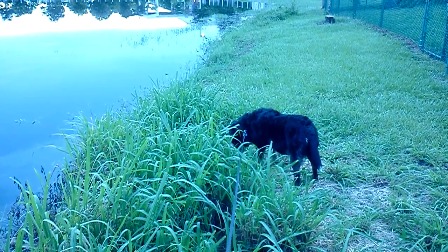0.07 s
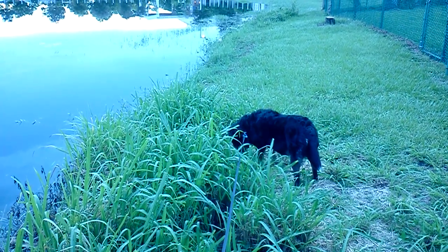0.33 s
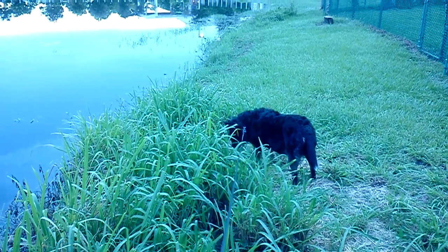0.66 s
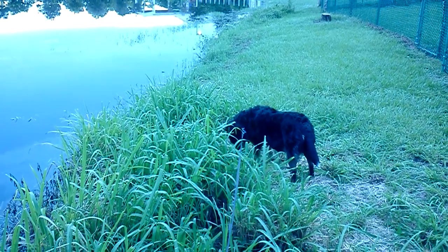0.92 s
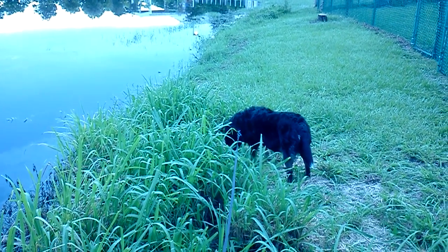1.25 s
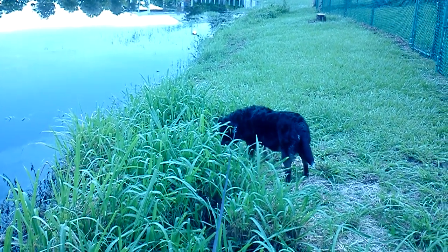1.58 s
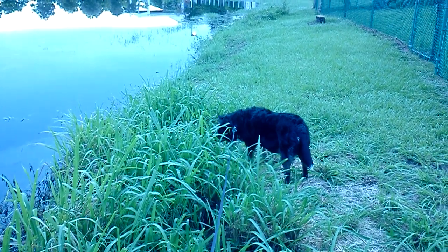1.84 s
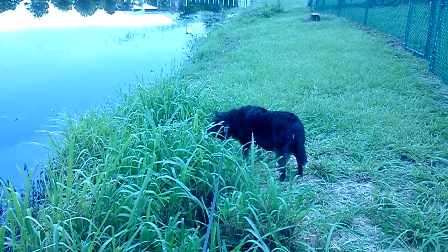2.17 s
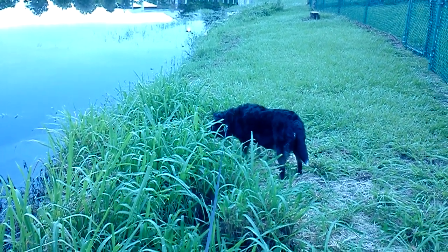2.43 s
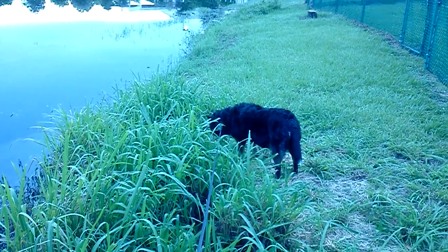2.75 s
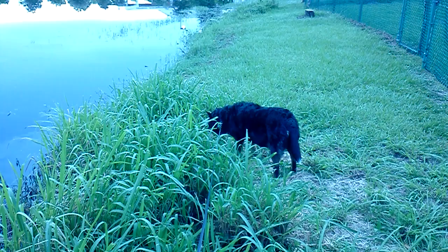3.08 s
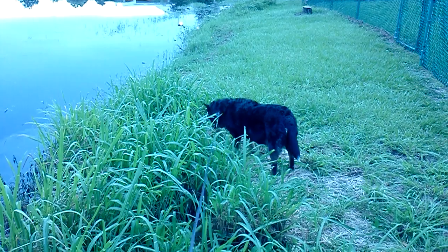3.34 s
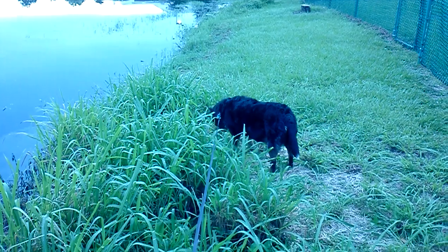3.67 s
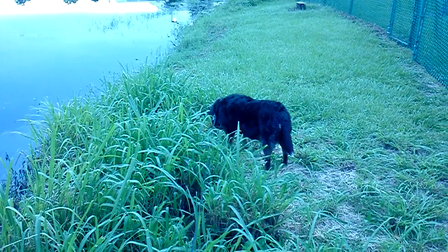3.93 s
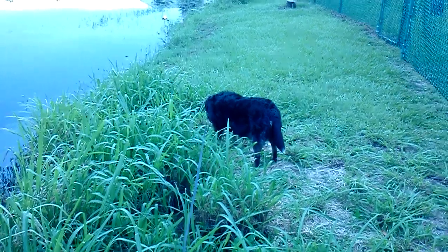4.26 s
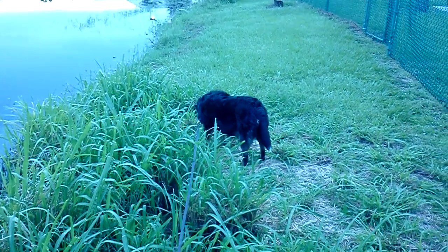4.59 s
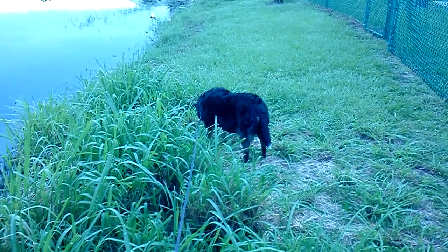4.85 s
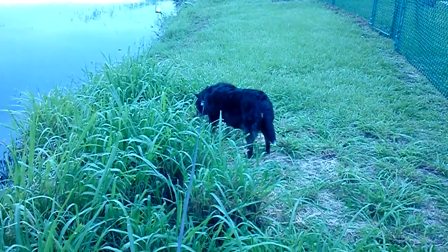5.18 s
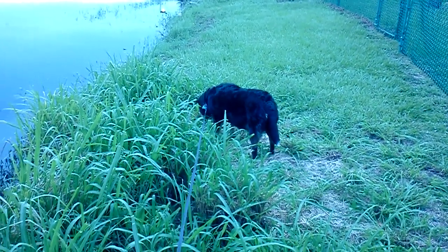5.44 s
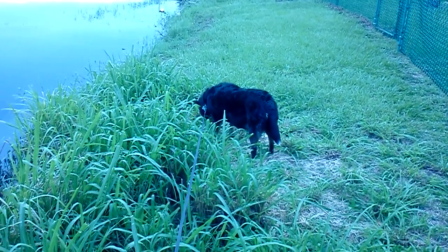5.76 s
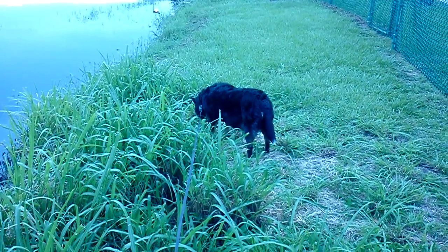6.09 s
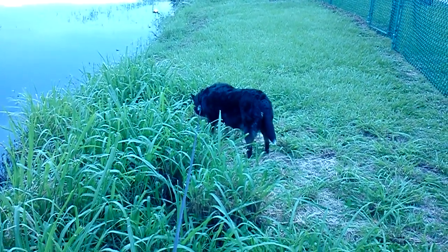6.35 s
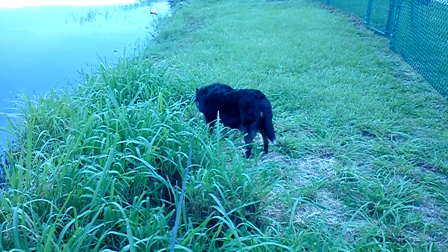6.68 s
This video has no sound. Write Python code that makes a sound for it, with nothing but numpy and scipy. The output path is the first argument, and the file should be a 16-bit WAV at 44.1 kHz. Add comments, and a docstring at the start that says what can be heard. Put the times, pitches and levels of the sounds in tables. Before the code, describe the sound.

A quiet outdoor wash of far traffic and softly hissing grass runs throughout, heard from one microphone beside a pond. Thin insect calls come and go. Late on, after some tiny ticks, plastic creaks and cracks four times in quick succession, very close and much louder than the surroundings. Then the faint insects resume, and a far bird whistles two thin notes, the second falling.

```python
"""On the bank of a pond, one microphone: distant traffic rumbles and washes throughout, with a faint hum
and a soft hiss of grass that sinks and swells. Far insects shrill from about one second in.
A few faint ticks lead, after five seconds, to four sharp, dry snaps and creaks close to the microphone,
like a plastic housing under strain: a first crack, small following clicks in some, and a last crack.
At the end the insects return, and a far bird gives a pip and a falling whistle."""
import sys
import numpy as np
from scipy import signal
from scipy.fft import rfft, irfft, next_fast_len
from scipy.io import wavfile
from scipy.ndimage import uniform_filter1d, map_coordinates

SR = 44100
rng = np.random.default_rng(int(sys.argv[2]) if len(sys.argv) > 2 else 0)


def store_wav(level_fs):
    """Save 16-bit WAV to argv[1]."""
    pcm = np.round(np.clip(np.atleast_2d(level_fs), -1, 1) * 32767)
    wavfile.write(sys.argv[1], SR, pcm.T.astype(np.int16))


N = 296352


def amp(db):
    """Decibels to gain."""
    return 10 ** (np.asarray(db) / 20)


def unit(x):
    """Scale to rms 1."""
    return x / np.sqrt(np.mean(x ** 2) + 1e-20)


def curve(rows):
    """Join (time, value) points into one value per sample."""
    return np.interp(np.arange(N) / SR, *np.transpose(rows))


def wobble(rate):
    """A smooth random curve, rate knots a second."""
    knots = rng.standard_normal(int(N * rate / SR) + 4)
    return map_coordinates(knots, [np.arange(N) * rate / SR])


def noise(spectrum, size):
    """Noise of rms 1 with a (Hz, dB) spectrum read on a log axis."""
    padded = next_fast_len(size + SR // 4)
    hz, db = np.transpose(spectrum)
    gain = amp(np.interp(np.log(np.fft.rfftfreq(padded, 1 / SR) + 1), np.log(hz), db))
    return unit(irfft(rfft(rng.standard_normal(padded)) * gain, padded)[:size])


def rush(spectrum, patchy_db):
    """Steady noise whose level drifts in patches of time and frequency."""
    bins = signal.stft(noise(spectrum, N), nperseg=512)[2]
    patches = uniform_filter1d(rng.standard_normal(bins.shape), size=7, axis=0)
    patches = uniform_filter1d(patches, size=20, axis=1)
    return unit(signal.istft(bins * amp(patchy_db * unit(patches)))[1][:N])


def spell(start, length, attack, release):
    """An envelope that rises, holds and falls back to silence within its length."""
    t = np.arange(N) / SR - start
    return np.clip(np.minimum(t / attack, (length - t) / release), 0, 1)


def fade(t, t60):
    """Exponential decay, 60 dB down after t60."""
    return np.exp(-np.log(1000) * t / t60)


def ring(t, hz, t60):
    """A damped sine that starts at t = 0."""
    t = np.maximum(t, 0)
    return np.sin(2 * np.pi * hz * t) * fade(t, t60)


def add(track, start, sound):
    """Mix a sound into the track, start seconds in."""
    part = track[round(start * SR):][:len(sound)]
    part += sound[:len(part)]


# spectra of the far roads, heard from the bank: (frequency [Hz], relative level [dB])
RUMBLE_SPECTRUM = [(12, -16), (30, -11), (54, -0.5), (115, 0), (170, -2), (250, -4.5), (330, -6.5),
                   (420, -14), (520, -24.5), (900, -65)]
TYRE_SPECTRUM = [(250, -28), (480, -8), (600, -0.5), (1030, 0.5), (1270, -6), (1620, -2.5), (2200, -9.5),
                 (3000, -12.5), (5000, -24), (8000, -50)]
# wash of the tyres: (time [s], level [dB])
TYRE_LEVEL = [(0, -45.5), (3.3, -47), (5.3, -45), (6.72, -46)]


def traffic(rumble_db=-43):
    """Far roads: a low rumble and a wash of tyres, with a ground dip between them."""
    rumble = amp(rumble_db + 0.4 * wobble(5.6)) * rush(RUMBLE_SPECTRUM, patchy_db=0.65)
    wash = amp(curve(TYRE_LEVEL) + 0.25 * wobble(3)) * rush(TYRE_SPECTRUM, patchy_db=0.72)
    return rumble + wash


def hum(hz=119, level_db=-56.5, drift=0.01205):
    """A faint low hum in the background, wavering in pitch and strength."""
    phase = 2 * np.pi * np.cumsum(hz * (1 + drift * wobble(3))) / SR
    return amp(level_db + 1.8 * wobble(2)) * unit(np.sin(phase))


# hiss of the grass: (frequency [Hz], relative level [dB])
GRASS_SPECTRUM = [(1200, -23.5), (2400, -5), (3100, -1.5), (3900, 2), (4700, 1), (5500, -4.5),
                  (6450, -10.5), (6850, 0.5), (7150, -2), (7480, -11), (7750, -46.5), (8800, -20.5)]
# its slow swell: (time [s], relative level [dB])
GRASS_SWELL = [(0.0, -55.5), (2.36, -55.5), (2.94, -57), (4.13, -58.5), (5.17, -56), (6.72, -56.5)]


def grass(mean_db=-51):
    """Tall grass on the bank: a fine hiss that slowly sinks and swells."""
    swell_db = curve(GRASS_SWELL)
    return amp(mean_db + swell_db - swell_db.mean()) * rush(GRASS_SPECTRUM, patchy_db=0.9)


# spells of insect calling: (time [s], length [s], level [dB])
INSECT_SPELLS = [(1.17, 0.32, -54), (1.55, 1.29, -52.5), (6.12, .6, -55)]
# their shrill band: (frequency [Hz], relative level [dB])
INSECT_SPECTRUM = [(2000, -45.5), (3000, -17), (3600, -4.5), (3950, 2.5), (4450, -0.5), (4900, 0),
                   (5600, -8.5), (6200, -13), (7200, -27), (8000, -51.5)]


def insects(lull_db=-66.5, flutter_db=2.0):
    """Far from the microphone, a thin chorus comes and goes over a faint floor."""
    calling = sum(amp(db) * spell(start, length, attack=0.15, release=0.26)
                  for start, length, db in INSECT_SPELLS)
    flutter = amp(flutter_db * wobble(25))
    return np.hypot(calling, amp(lull_db)) * flutter * rush(INSECT_SPECTRUM, patchy_db=1.0)


def crackle(t, count=7, span_s=0.008, low_hz=1800, high_hz=6400, t60=0.006):
    """Tiny ticks, each at its own pitch, run on for a few milliseconds after a click."""
    when, pitch, strength = rng.random((count, 3)).T[:, :, None]
    hz = low_hz + (high_hz - low_hz) * (np.arange(count)[:, None] + pitch) / count
    return np.sum((1 + strength) / 2 * ring(t - span_s * when, hz, t60), axis=0)


# the crack, and its scatter off things nearby: (frequency [Hz], relative level [dB])
CRACK_SPECTRUM = [(300, -27), (1300, -17.5), (2000, -3), (3500, 1), (5600, -8.5), (6250, -9), (7200, -1),
                  (7800, -20), (8800, -23.5)]
SCATTER_SPECTRUM = [(300, -18), (1500, -7), (2700, -2.5), (3300, 1.5), (4000, -6), (4400, -2.5), (5000, 2),
                    (5500, -1.5), (6200, -8), (7000, 0), (9000, -11)]
# the lightest and the heaviest click:
# (high ring pitch [Hz], high ring gain [dB], ring t60 [s], crack [dB], knock [dB], crackle [dB])
LIGHT_TICK = (6100, 5, .0065, -4, -38, -1)
HEAVY_SNAP = (4230, -1.5, 0.0077, -15, -5.5, -22)


def click(low_hz, weight, attack_s=0.00019, scatter_db=-2.0, scatter_rise_s=0.0021):
    """One click, close up: crack, two rings, knock and crackle; heavy ones are lower and cleaner."""
    t = np.arange(SR // 12) / SR
    blend = np.add(LIGHT_TICK, weight * np.subtract(HEAVY_SNAP, LIGHT_TICK))
    high_hz, high_db, t60, crack_db, knock_db, crackle_db = blend
    # the two modes start in opposite directions, so they reinforce each other between their pitches
    rings = ring(t, low_hz, t60) - amp(high_db) * ring(t, high_hz, t60)
    crack = amp(crack_db) * noise(CRACK_SPECTRUM, len(t)) * fade(t, t60=0.0075)
    knock = amp(knock_db) * ring(t, hz=750, t60=0.0035)
    onset = 1 - np.exp(-t / attack_s)
    direct = (rings + crack + knock) * onset + amp(crackle_db) * crackle(t)
    # sound scattered by things nearby builds up at the microphone over a few milliseconds
    build_up = (1 - np.exp(-t / scatter_rise_s)) ** 2
    paths = noise(SCATTER_SPECTRUM, len(t)) * fade(t, t60=0.045) * build_up
    paths /= np.abs(rfft(paths)).max()
    return direct + amp(scatter_db) * signal.fftconvolve(direct, paths)[:len(t)]


# close ticks, snaps and creaks: (time [s], first crack gain [dB], ring pitch [Hz], weight [0-1],
# length [s], following clicks [count, none if below 1], last crack gain [dB])
SNAPS = [ (3.443, -35, 3400, .15, .002, 0, -42), (3.583, -39.5, 3300, .2, .002, -1, -46),
         (3.666, -43, 4800, .05, .008, 0, -39), (4.9452, -26.5, 3030, .3, .002, 0, -39),
         (5.3355, -4, 2780, .99, 0.0057, 0, -30), (5.4627, -18, 2510, .5, .0106, 2, -16.5),
         (5.6037, -6.5, 2450, .72, 0.018, 3, -10), (5.716, -4.5, 2480, .54, 0.0069, 0, -11), ]


def snaps(follow_db=-4.5, spread_s=0.0004, spread_octaves=0.17):
    """Creaks as of plastic at the microphone: a first crack, small clicks in some, a last crack."""
    track = np.zeros(N)
    for start, first_db, hz, weight, length, count, last_db in SNAPS:
        add(track, start, amp(first_db) * click(hz, weight))
        # the last crack is light and rings a little higher
        last_hz, last_weight = hz * 1.06, min(weight, 0.34)
        for follow_s in np.linspace(start, start + length, round(count) + 2)[1:-1]:
            late, sharp = rng.standard_normal(2)
            follow_hz = last_hz * 2 ** (spread_octaves * sharp)
            follower = click(follow_hz, rng.uniform(last_weight, weight))
            add(track, follow_s + spread_s * late, amp(last_db + follow_db) * follower)
        add(track, start + length, amp(last_db) * click(last_hz, last_weight))
    return track


# a pip and a falling whistle: (time [s], length [s], starting pitch [Hz], glide [Hz/s], level [dB])
BIRD_NOTES = [(6.419, 0.039, 4100, 3200, -49.5), (6.47, 0.16, 3240, -2350, -49.5)]


def bird(waver=0.0066, flutter_db=2.5):
    """A far bird whistles thin notes, each one straight glide, fluttering with distance."""
    t = np.arange(N) / SR
    track = np.zeros(N)
    for start, length, start_hz, glide, db in BIRD_NOTES:
        hz = start_hz + glide * np.clip(t - start, 0, length)
        phase = 2 * np.pi * np.cumsum(hz * (1 + waver * wobble(120))) / SR
        envelope = spell(start, length, attack=0.33 * length, release=0.37 * length)
        track += envelope * amp(db + flutter_db * wobble(50)) * unit(np.sin(phase))
    return track


def scene():
    """One microphone on the bank: the surroundings, and the snaps close by."""
    surroundings = traffic() + hum() + grass() + insects() + bird()
    return (surroundings + snaps())[None]


# the microphone's top end: (frequency [Hz], gain [dB])
MIC_TREBLE = [(7350, 0), (7900, -13), (8700, -5.5), (9150, -23.5)]


def record(dry, limit_hz=9150):
    """The microphone dulls the top end and keeps nothing above its band limit."""
    padded = next_fast_len(N + SR // 2)
    hz = np.fft.rfftfreq(padded, 1 / SR)
    response = amp(np.interp(hz, *np.transpose(MIC_TREBLE))) * (hz < limit_hz)
    return irfft(rfft(dry, padded) * response, padded)[..., :N]


dry = scene()
out = record(dry)
store_wav(out)
```